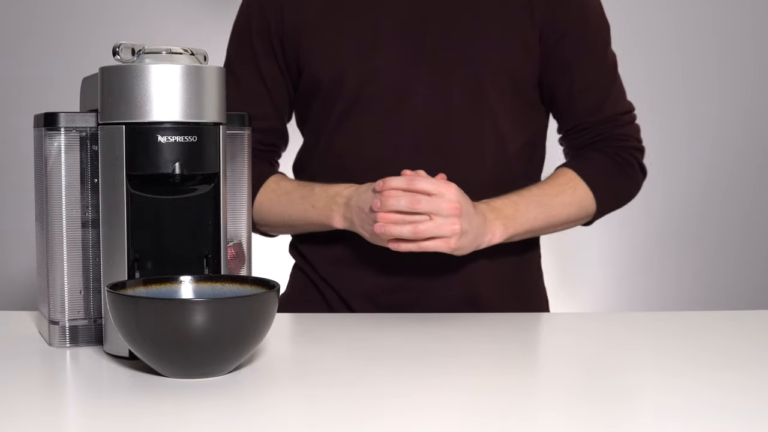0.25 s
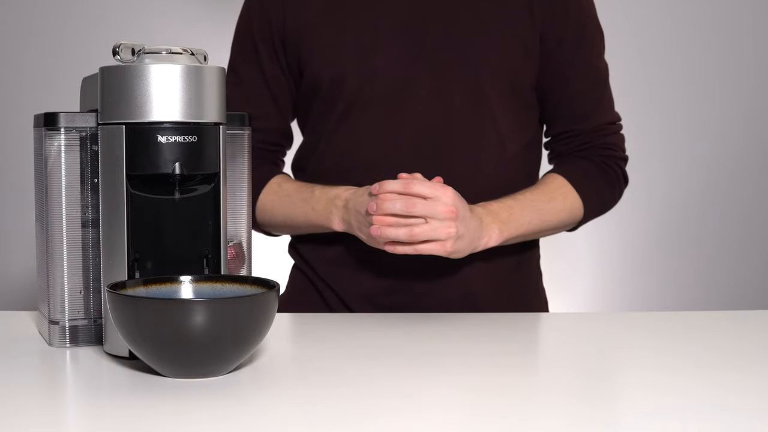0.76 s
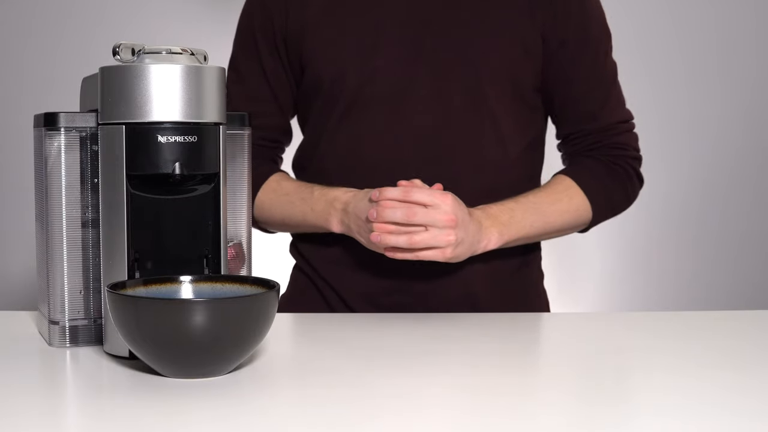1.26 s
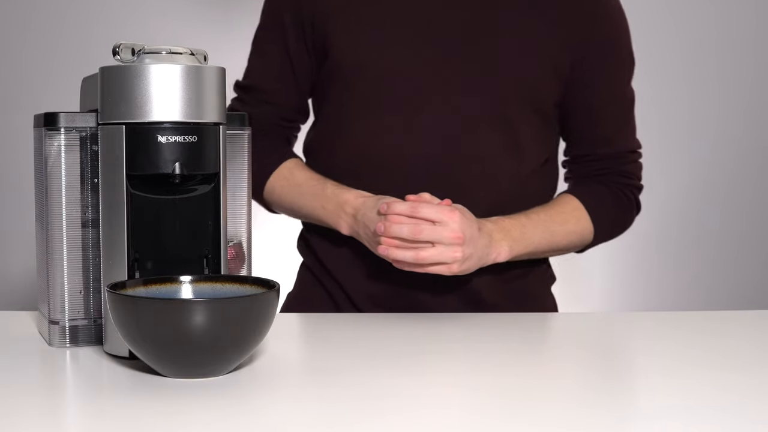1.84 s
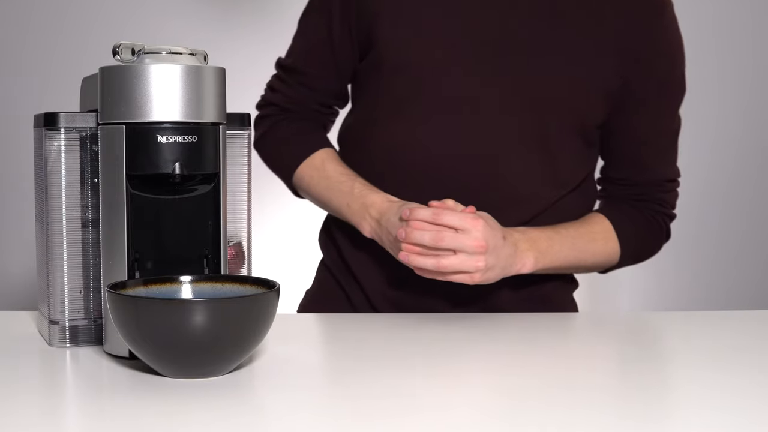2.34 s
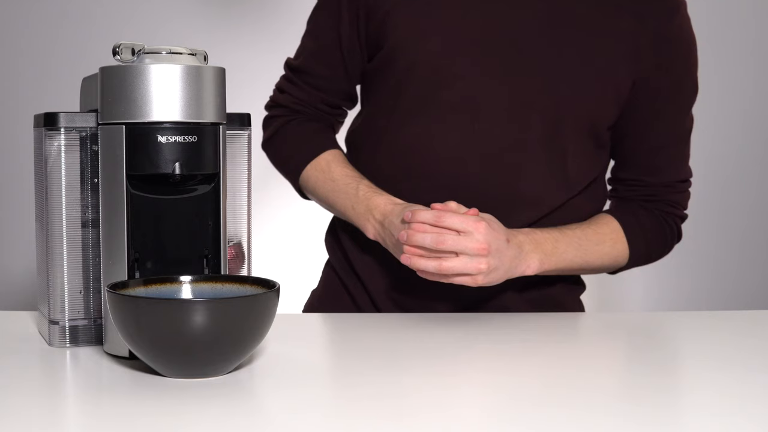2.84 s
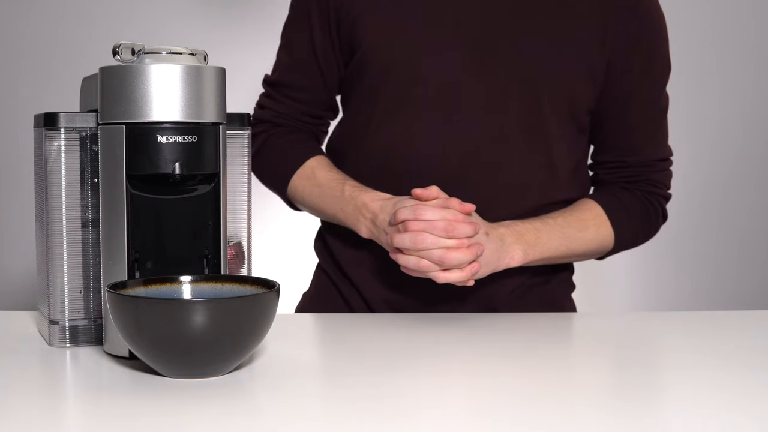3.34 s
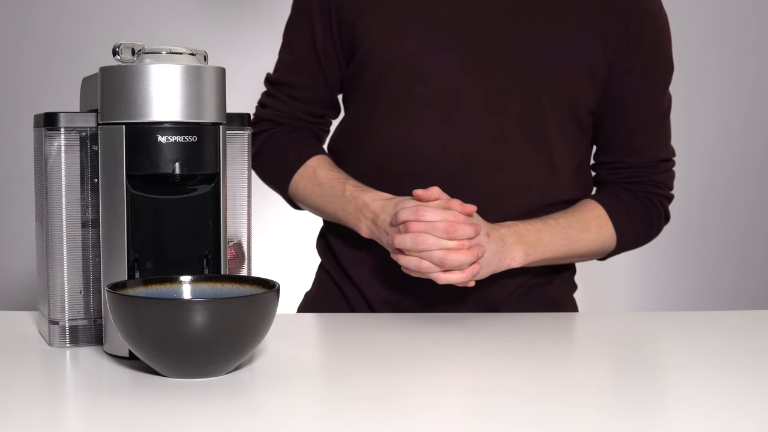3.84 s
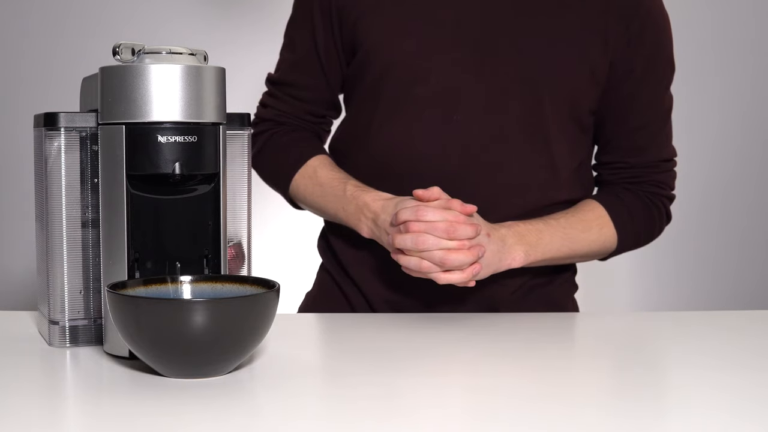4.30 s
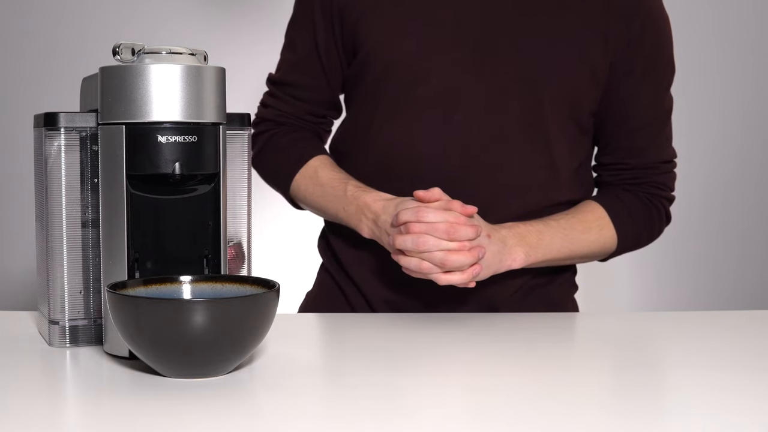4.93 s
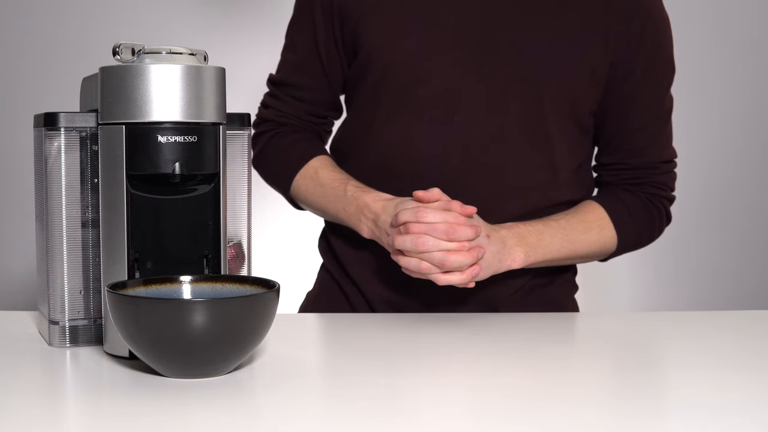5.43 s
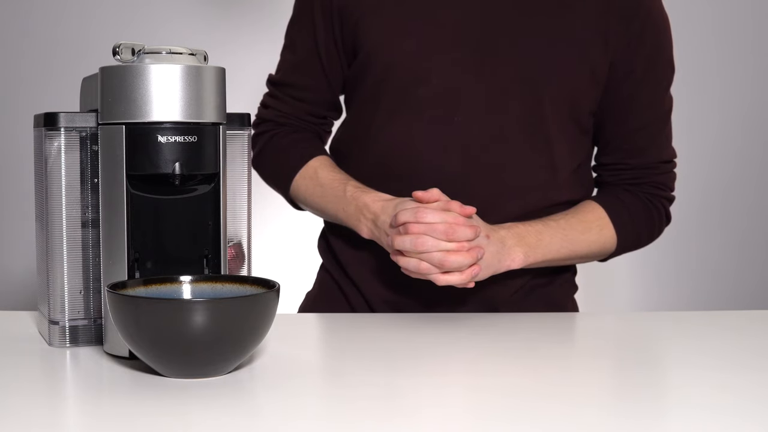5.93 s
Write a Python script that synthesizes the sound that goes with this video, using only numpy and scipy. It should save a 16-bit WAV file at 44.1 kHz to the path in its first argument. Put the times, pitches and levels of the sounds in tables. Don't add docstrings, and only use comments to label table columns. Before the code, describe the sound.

Close stereo view of a coffee machine on a kitchen counter. Its pump buzzes at mains rate with rattling valves, hiss and a steady whine; steam puffs briefly at the start and water spits into a bowl. Just after three seconds a soft bump and power cut stop the buzz, the pump rocks dully, and the rotor whirs down to faint room tone.

```python
import sys
import numpy as np
from scipy import signal
from scipy.fft import rfft, irfft, next_fast_len
from scipy.io import wavfile

SR = 44100
rng = np.random.default_rng(int(sys.argv[2]) if len(sys.argv) > 2 else 0)


def unload_wav(signal):
    wavfile.write(
        sys.argv[1],
        SR,
        np.round(np.clip(np.atleast_2d(signal).T, -1, 1) * 32767).astype(np.int16),
    )


def magnitude_from_level(level_db):
    exponent = np.asarray(level_db, float) / 20
    return 10 ** exponent


N = 271479
TIME = np.arange(N) / SR
CUT_S, STOPPED_S = 3.22, 3.42
POWERED = round(3.45 * SR)

# frequency in Hz, likeness from 0 to 1.
MACHINE_LIKENESS = [(60, 1.0), (180, 1.0), (550, 0.96), (1650, 0.74), (4970, 0.45), (15000, 0.45)]


def at_hz(points, hz):
    point_hz, value = np.transpose(points)
    return np.interp(np.log(hz + 1e-9), np.log(point_hz), value)


def rms_one(x):
    return x / np.sqrt(np.mean(x ** 2) + 1e-20)


def drift(rate, size=N):
    r = np.exp(-80 * np.pi * rate / SR)
    steps = rng.standard_normal(size // 40 + 2002)
    slow = signal.lfilter([1], [1, -2 * r, r * r], steps)[2000:]
    return np.interp(np.arange(size) / 40, np.arange(len(slow)), rms_one(slow))


def swell(start_s, rise_s, hold_s, fall_s):
    age = TIME - start_s
    rise = age / rise_s
    fall = (rise_s + hold_s + fall_s - age) / fall_s
    return np.clip(np.minimum(rise, fall), 0, 1)


def resonance(x, hz, width_hz):
    r = np.exp(-np.pi * width_hz / SR)
    top = np.array([1, 0, -1]) * (1 - r * r) / 2
    return signal.lfilter(top, [1, -2 * r * np.cos(2 * np.pi * hz / SR), r * r], x)


def ring(clicks, hz, t60):
    r, w = magnitude_from_level(-60 / (t60 * SR)), 2 * np.pi * hz / SR
    return signal.lfilter([0, np.sin(w)], [1, -2 * r * np.cos(w), r * r], clicks + 1e-18)


def noise(spectrum, likeness=MACHINE_LIKENESS):
    size = next_fast_len(N)
    hz = np.arange(size // 2 + 1) * SR / size
    mid, side = rfft(rng.standard_normal((2, size))) * magnitude_from_level(at_hz(spectrum, hz))
    alike = np.clip(at_hz(likeness, hz), 0, 1)
    both = np.sqrt(1 + alike) * mid + np.sqrt(1 - alike) * side * [[1], [-1]]
    return rms_one(irfft(both, size)[:, :N])


# frequency in Hz, level in dB per Hz.
ROOM_COLOUR = [(8.8, -54), (15, -24), (91, -17.5), (122, -6), (168, -14.5), (206, -5.5), (267, -12.5),
               (300, -6.5), (379, -8), (465, -5.5), (659, -9), (907, -10), (15700, -19.5)]
# frequency in Hz, left-right likeness from 0 to 1.
ROOM_LIKENESS = [(60, 0.78), (130, 0.94), (290, 0.66), (640, 0.06), (1400, 0.013), (15000, 0.18)]


def room_tone():
    return magnitude_from_level(-58) * noise(ROOM_COLOUR, ROOM_LIKENESS)


# start and hold in seconds, lift in dB of the lowest, middle
TUBE_STRAINS = [(0, 0.25, 9, 13, 10), (0.312, .08, -5, 2.5, 8.5), (.76, 0.048, -1, 4, -12),
                (1.283, 0.16, 2, -8, 5), (1.56, 0.055, -1, -2, -4), (1.92, 0.069, -4, 5.5, 3),
                (2.12, 0.21, -3.5, -6, 8), (2.4, .1, 5, 5.5, 11), (2.557, 0.14, 5, 8.5, 2.5),
                (2.688, 0.34, -2.5, -5, 8), (2.948, .02, 0.1, 6, 1), (3.084, 0.15, 3.5, 8, 8)]


def strain():
    rise_s, ease_s = 0.1, 0.044
    return sum(np.outer(lift_db, swell(start_s - rise_s, rise_s, hold_s, ease_s))
               for start_s, hold_s, *lift_db in TUBE_STRAINS)


def effort():
    off_s = np.maximum(TIME - CUT_S, 0)
    priming = swell(-0.7, 0.1, 1.0, 0.03)
    stroke_db = -35 - 0.5 * priming - 143 * off_s
    kicks = sum(magnitude_from_level(peak_db + 15) * swell(s - 0.01, 0.015, 0.0054, 0.032) for s, peak_db, hz in BOWL_SPITS)
    rattle_db = -36 + 0.23 * strain().mean(axis=0) + 2.5 * kicks
    return stroke_db, np.maximum(rattle_db - 250 * off_s, -40.5)


MAINS_HZ = 59.97
STROKE_REF_DB = -32.5
# multiple of the mains rate, level in dB rms.
PUMP_HARMONICS = [(1, -54), (2, -69.5), (3, -61), (4, -50), (5, -37.5), (6, -36), (7, -36.5), (8, -43),
                  (9, -44.5), (10, -39), (11, -39.5), (12, -42), (13, -43), (14, -43.5), (15, -52.5),
                  (16, -45.5), (17, -44), (18, -41.5), (19, -48), (20, -42), (21, -46), (23, -44.5),
                  (26, -47.5), (27, -45.5), (28, -49), (29, -48), (32, -43.5), (38, -47.5), (40, -43.5),
                  (47, -49)]
SLACK_TUBE_DB = (-0.9, -4, -3.5)


def pump_tone(stroke_db, wobble, second_knock):
    cycle = 2 * np.pi * MAINS_HZ * TIME[:POWERED]
    effort_db = stroke_db[:POWERED] - STROKE_REF_DB
    hum_db = np.minimum(effort_db + 7.5, 0)
    casing_db = (strain() + np.array(SLACK_TUBE_DB)[:, None])[:, :POWERED]
    low_db, middle_db, high_db = np.minimum(effort_db + 2.5, 0) + casing_db
    loading_db = {1: hum_db, 4: low_db, 8: middle_db, 20: high_db}
    out = np.zeros((2, N))
    for k, level_db in PUMP_HARMONICS:
        knocks = np.angle(1 + second_knock * np.exp(-2j * np.pi * 0.6 * k))
        blur = np.minimum(wobble * k, 0.6)
        uneven_db = effort_db + 6 * blur * drift(1.37, size=POWERED)
        loudness = magnitude_from_level(level_db + loading_db.get(k, uneven_db))
        phase = k * (cycle - 1.3) + knocks + 0.06 * k * k + blur * drift(0.72, size=POWERED)
        alike = np.clip(at_hz(MACHINE_LIKENESS, k * MAINS_HZ), 0, 1)
        apart = np.arccos(alike) / 2 * np.clip(k / 20, 0, 1)
        turn = apart * (rng.choice([-1, 1]) + 1.2 * drift(0.51, size=POWERED))
        out[:, :POWERED] += np.sqrt(2) * loudness * np.cos(phase + turn * [[1], [-1]])
    return out


# frequency in Hz, level in dB per Hz.
RATTLE_COLOUR = [(60, -55), (95, -47), (190, -30), (285, -10.5), (360, -6), (470, -11.5), (640, -13),
                 (775, -7), (930, -8.5), (1240, -9), (2110, -10), (2900, -11), (4300, -23), (5600, -47)]
# frequency in Hz, level in dB per Hz.
JET_COLOUR = [(2470, -31), (4200, -8.5), (4660, -2), (5500, -2), (7660, -7), (14300, -11.5), (15700, -7)]
# frequency in Hz, width in Hz, level in dB over the noise.
CASING_MODES = [(493, 5, 11.5), (548, 22, 13), (785, 18, -3), (1270, 29, 7.5), (1680, 82, 1.5),
                (1990, 32, 1.5), (2740, 58, -2), (2836, 84, -1), (2940, 19, 1), (3124, 23, 0.5),
                (3550, 4.2, 14.5), (3900, 6.9, -12), (3890, 60, 4), (4680, 12, 6), (4810, 5.2, 17.5),
                (5640, 55, -4), (6010, 9.3, 10.5), (6180, 33, -6), (7150, 24, 11), (7440, 30, 6),
                (7730, 69, -8)]


def valve_rattle(rattle_db, stroke_db, gate_db):
    cycle = 2 * np.pi * MAINS_HZ * TIME
    gate = magnitude_from_level(gate_db * (np.cos(cycle - 0.6) + 0.17 * np.cos(3 * cycle)))
    rattle = magnitude_from_level(rattle_db - 1 + 0.46 * drift(51)) * noise(RATTLE_COLOUR)
    pressure_db = np.minimum(stroke_db - STROKE_REF_DB + 2, 0)
    jet = magnitude_from_level(-44 + 1.3 * pressure_db + 0.5 * drift(30)) * noise(JET_COLOUR)
    loose = gate * (rattle + jet)
    running = loose[:, :POWERED]
    loose[:, :POWERED] += sum(magnitude_from_level(db) * resonance(running, hz, width_hz) for hz, width_hz, db in CASING_MODES)
    taut_tube = magnitude_from_level(-3.5 + 0.66 * strain()[1]) * resonance(loose, 770, 58)
    return loose + taut_tube


# time in seconds, whine pitch in Hz.
ROTOR_SPEED = [
    (0, 624),
    (3.25, 624),
    (3.55, 458),
    (3.86, 290),
    (4.1, 190),
    (4.4, 100),
    (4.7, 12),
]


def rotor_motion():
    s, pitch_hz = np.transpose(ROTOR_SPEED)
    hz = np.interp(TIME, s, pitch_hz)
    return hz, hz / hz[0], np.clip((s[-1] - TIME) / 0.1, 0, 1)


def rotor_whine():
    hz, share, turning = rotor_motion()
    phase = 2 * np.pi * np.cumsum(hz * (1 + 0.00626 * drift(11.7))) / SR
    first = magnitude_from_level(-55) * share ** 1.3 * np.sin(phase)
    octave = magnitude_from_level(-53.5 + 2.5 * drift(25)) * share ** 0.8 * np.sin(2 * phase)
    sung = magnitude_from_level(17.5) * first + magnitude_from_level(7) * octave
    whine = first + octave + resonance(resonance(sung, 500, 70), 500, 70)
    radiates = signal.butter(4, 380, "high", fs=SR, output="sos")
    return signal.sosfilt(radiates, whine) * turning


# level in dB, knee as share of full speed, steepness of the fade below it,
# extra dB while driven.
BEARING_BANDS = [
    (-48, 0.14, 1.7, 8.5),
    (-47, 0.34, 2.05, 1.5),
    (-45.5, 0.66, 2.3, 0.85),
    (-48, 1, 1.8, 1),
]
# frequency in Hz, width in Hz, level in dB.
HOUSING_MODES = [(261, 72, -9), (356, 42, -6.5), (521, 66, -2.5), (823, 170, -9), (998, 180, -9),
                 (1203, 48, -2.5), (1254.6, 17, 6), (1352, 158, -6.5)]
# frequency in Hz, level in dB per Hz.
WHIRR_COLOUR = [(880, -53), (1500, 0), (1760, -2.5), (2170, 1), (2410, 0), (2910, 2.5), (3750, -3),
                (4190, -13), (4700, -7), (6110, -31), (10300, -120)]
# frequency in Hz, level in dB per Hz.
AIR_COLOUR = [(2530, -15), (4300, 0.5), (4610, 1), (5690, -6), (6000, -2), (8000, -8), (10400, -34),
              (17600, -120)]
# frequency in Hz, level in dB per Hz.
HIGH_AIR_COLOUR = [(4710, -30), (8000, 0.5), (8580, 0.5), (13400, -8.5), (14500, -12), (15700, -14)]


def rotor_bearings():
    _, share, turning = rotor_motion()
    driven = np.exp(-np.maximum(TIME - 3.37, 0) / 0.11)
    rumble_db, whirr_db, air_db, high_db = (
        db + extra_db * driven - steep * 10 * np.log10(np.hypot(1, (knee / share) ** 2))
        for db, knee, steep, extra_db in BEARING_BANDS)
    grit = noise([(100, -17), (300, -1.5), (2000, 1), (4000, -21)])
    rumble = sum((-1) ** i * magnitude_from_level(db) * resonance(grit, hz, width_hz)
                 for i, (hz, width_hz, db) in enumerate(HOUSING_MODES))
    strained_db = 0.57 * (strain()[2] - 9.5 * (TIME < CUT_S))
    rumble = magnitude_from_level(rumble_db + strained_db + 1.7 * drift(14)) * rms_one(rumble)
    hiss = magnitude_from_level(whirr_db) * noise(WHIRR_COLOUR) + magnitude_from_level(air_db) * noise(AIR_COLOUR)
    hiss += magnitude_from_level(high_db) * noise(HIGH_AIR_COLOUR)
    return (rumble + hiss) * turning


# start in seconds, hold in seconds, level in dB.
STEAM_PUFFS = [
    (-.002, 0.019, -31.5),
    (0.044, 0.015, -31.5),
    (0.096, .008, -39),
]
# frequency in Hz, level in dB per Hz.
STEAM_COLOUR = [(2120, -52), (3600, -15), (3990, -12), (4090, -1), (4680, -2), (5010, 2.5), (5520, -4),
                (8310, -3), (9340, -8.5), (14600, -19.5), (15500, -38)]


def steam():
    puffs = sum(magnitude_from_level(db) * swell(s, 0.021, hold_s, 0.026) for s, hold_s, db in STEAM_PUFFS)
    leak = magnitude_from_level(-44.5) * swell(-0.12, 0.083, 0.22, 0.13)
    return (puffs + leak) * magnitude_from_level(2.1 * drift(90)) * noise(STEAM_COLOUR, [(3000, 0.65), (15000, 0.6)])


# start in seconds, hold in seconds, level in dB.
COUNTER_SHUDDERS = [
    (-.03, .03, -55),
    (.1, 0.16, -53),
    (3.06, .09, -54),
    (3.227, 0.027, -57),
]


def shudder():
    low = noise([(110, -30), (150, -1), (215, 1), (270, -19)], [(100, 1), (300, 1)])
    moments = sum(magnitude_from_level(db) * swell(s, 0.022, hold_s, 0.05) for s, hold_s, db in COUNTER_SHUDDERS)
    steady = magnitude_from_level(-60.5) * swell(-1.04, 0.1, 0.95 + CUT_S, 0.1)
    return low * (moments + steady)


# time in seconds, peak in dB, bubble pitch in Hz.
BOWL_SPITS = [(0.1164, -19, 2640), (0.1979, -23, 1990), (0.7986, -24, 1930), (0.918, -19, 1460),
              (1.13, -26, 1680), (1.665, -16.5, 1990), (1.7306, -12, 2050), (1.951, -34, 1750),
              (2.365, -15.5, 2450), (2.451, -12, 1740), (2.599, -15.5, 2270), (2.8834, -34, 1740),
              (3.1994, -17, 2590), (4.3394, -32, 1660)]


def spits(length_s):
    out = np.zeros((2, N))
    splash = noise([(700, -28), (1300, -3), (3500, -2), (7000, -21)])
    for s, peak_db, hz in BOWL_SPITS:
        start = round(s * SR)
        span = slice(start, start + 4000)
        age = TIME[span] - s
        burst = splash[:, span] * np.exp(-age / length_s) * np.clip(age / 0.0027, 0, 1)
        bubble = 2.5 * resonance(burst, hz, 96)
        out[:, span] += magnitude_from_level(peak_db - 18.5) * (burst + bubble)
    return out


# time in seconds, level in dB.
MACHINE_JOLTS = [
    (3.085, -40),
    (3.238, -45.5),
    (3.5, -68),
]
# frequency in Hz, level in dB, t60 in seconds.
RUBBER_MOUNT = [
    (69, 2, 0.366),
    (131, -25, 0.91),
    (180, 0.5, 0.42),
]


def jolts():
    (bump_s, bump_db), *rocks = MACHINE_JOLTS
    bump, cut = np.zeros((2, N))
    bump[round(bump_s * SR)] = magnitude_from_level(bump_db)
    for s, db in rocks:
        cut[round(s * SR)] = magnitude_from_level(db)
    rocking = sum(magnitude_from_level(db) * resonance(ring(cut, hz, t60), hz, 14) for hz, db, t60 in RUBBER_MOUNT)
    return ring(bump, 40, 0.05) + rocking


def kitchen(x, wet_db, t60):
    age = np.arange(8000) / SR
    echoes = rng.standard_normal(len(age)) * magnitude_from_level(-60 * age / t60)
    echoes = magnitude_from_level(wet_db) * echoes / np.sqrt(np.sum(echoes ** 2))
    echoes[0] = 1
    echoes = echoes / np.sqrt(np.sum(echoes ** 2))
    return signal.fftconvolve(x, echoes[None], axes=1)[:, :N]


# frequency in Hz, left minus right in dB.
PORT_LEAN = [(300, -2), (700, -0.3), (1290, -2), (2400, 0), (4400, 0), (8100, -1), (15000, -4.5)]


def ports(x):
    size = next_fast_len(N)
    hz = np.arange(size // 2 + 1) * SR / size
    lean_db = at_hz(PORT_LEAN, hz) * np.clip(hz / 500 - 1, 0, 1)
    return irfft(rfft(x, size) * magnitude_from_level(lean_db / 2 * [[1], [-1]]), size)[:, :N]


def scene():
    stroke_db, rattle_db = effort()
    powered = np.clip((STOPPED_S - TIME) / 0.13, 0, 1)
    broad = powered * valve_rattle(rattle_db, stroke_db, gate_db=2.5)
    broad = broad + rotor_bearings() + steam() + spits(length_s=0.014)
    tones = powered * pump_tone(stroke_db, wobble=0.046, second_knock=1.0) + rotor_whine()
    machine = tones + kitchen(broad, wet_db=-11, t60=0.087) + shudder() + jolts()
    return ports(machine) + room_tone()


def band_limit(x):
    return signal.sosfilt(signal.butter(12, 16020, fs=SR, output="sos"), x)


def record(dry):
    top_cut = signal.cheby2(24, 60, 15900, fs=SR, output="sos")
    mix = signal.sosfilt(top_cut, dry)
    return band_limit(mix)


dry = scene()
out = record(dry)
unload_wav(out)
```